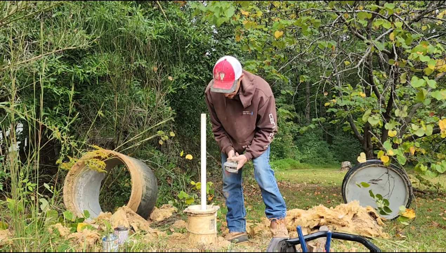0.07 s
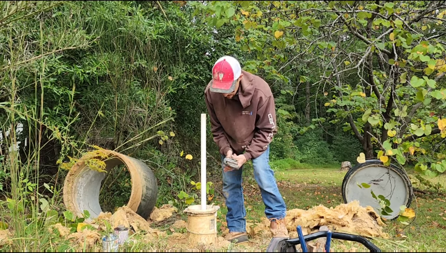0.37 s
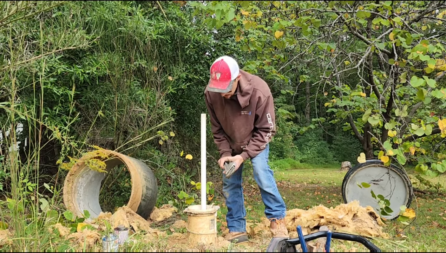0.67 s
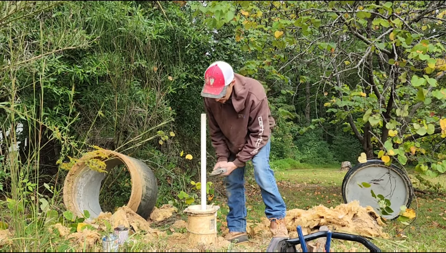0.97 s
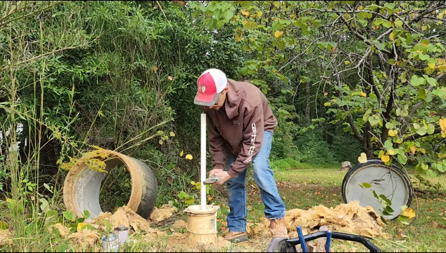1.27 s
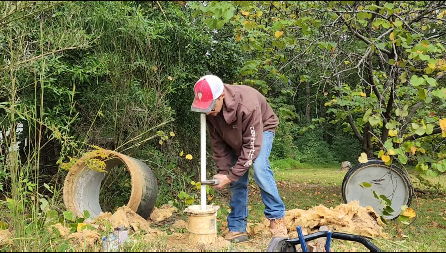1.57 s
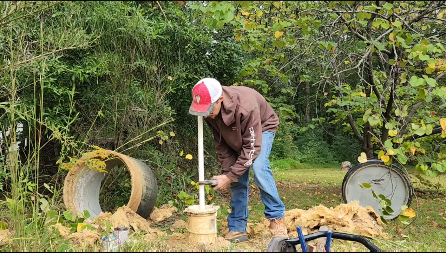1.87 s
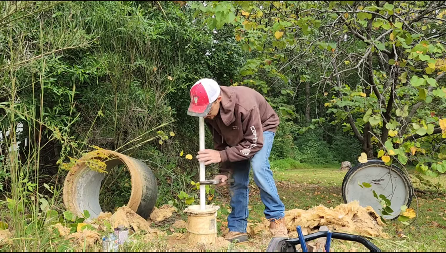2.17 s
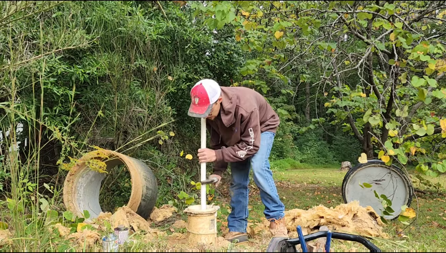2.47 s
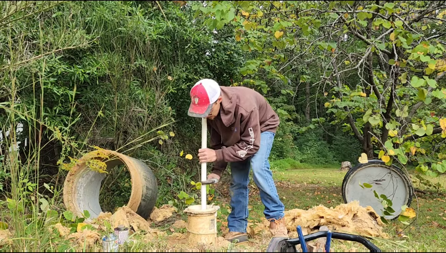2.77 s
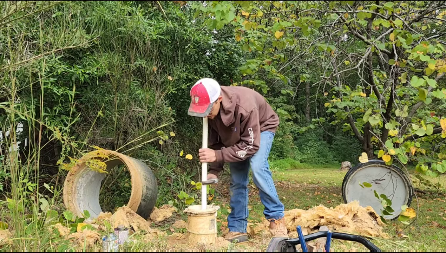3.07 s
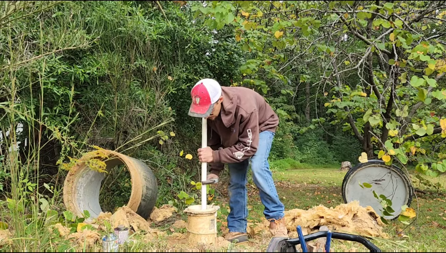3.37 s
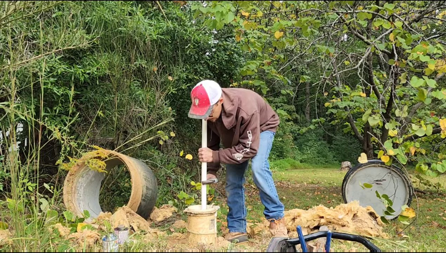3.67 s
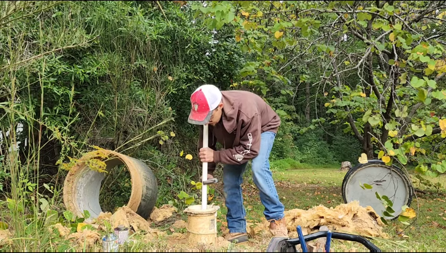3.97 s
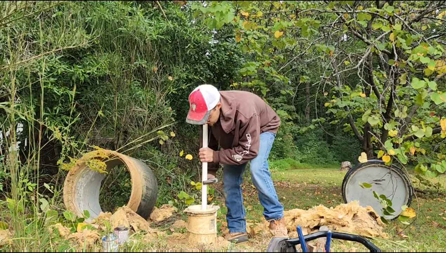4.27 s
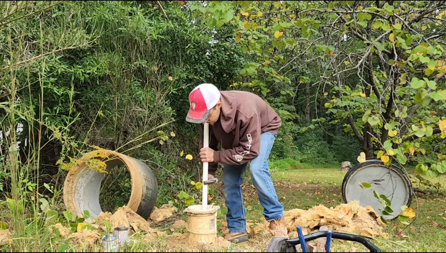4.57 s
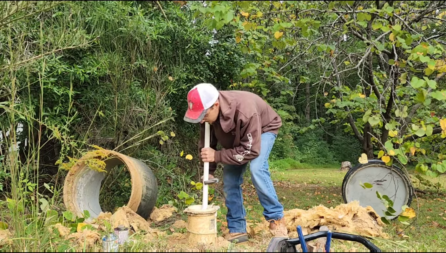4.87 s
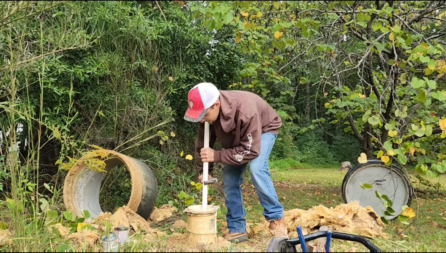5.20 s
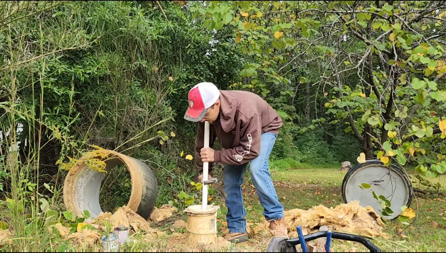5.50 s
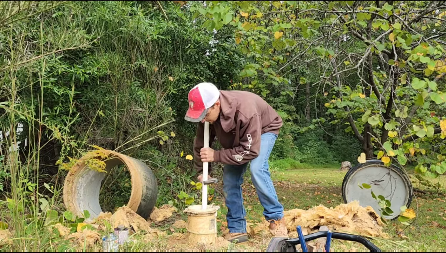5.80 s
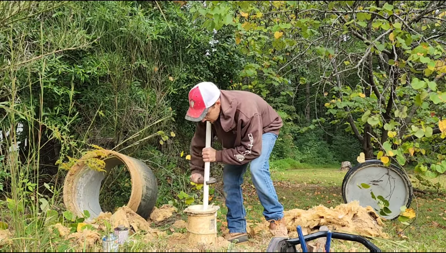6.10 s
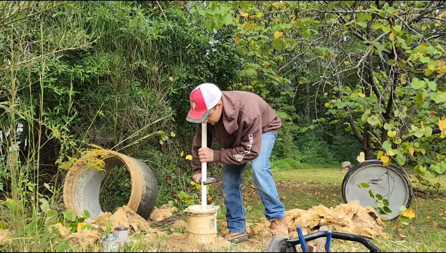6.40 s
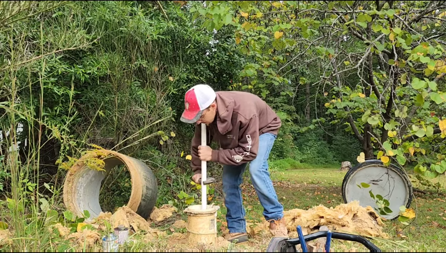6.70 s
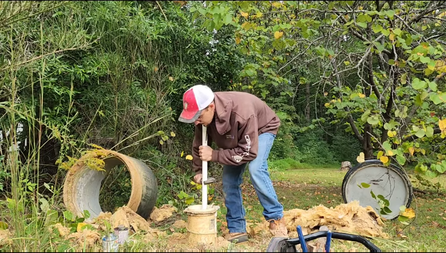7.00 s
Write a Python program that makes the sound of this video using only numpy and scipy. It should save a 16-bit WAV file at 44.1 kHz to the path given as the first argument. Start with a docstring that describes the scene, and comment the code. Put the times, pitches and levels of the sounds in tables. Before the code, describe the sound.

Scattered hollow knocks and one sharp splintering snap of a plastic pipe being cut outdoors, over low wind rumble and faint birds.

```python
"""A plastic well pipe, worked with a hand cutter a few metres ahead, gives with one splintering snap;
its bending waves disperse and return as a falling chirp. From the right come two runs of hollow
knocks, as of a hammer exciting the modes of boards. Trees at the edge of the wood scatter every blow.
A small bird chips over far calls, a cricket, a distant wash, a drone and leaf hiss; gusts and soft
bumps of the hand rumble on the phone that picks up the scene."""
import sys
import numpy as np
from scipy import signal
from scipy.fft import rfft, irfft
from scipy.io import wavfile
from scipy.ndimage import uniform_filter1d

SR = 44100
rng = np.random.default_rng(int(sys.argv[2]) if len(sys.argv) > 2 else 0)


def materialize(psi):
    """Save the field psi as 16-bit PCM at rate SR to the path in sys.argv[1].

    A 1-D psi becomes a single channel; in a 2-D psi each row is a channel.
    """
    bounded = np.clip(np.atleast_2d(psi).T, -1, 1)
    quanta = np.round(bounded * 32767).astype(np.int16)
    wavfile.write(sys.argv[1], SR, quanta)


N = 315092
T = np.arange(N) / SR
SHORT = T[:SR // 2]
RIGHT_LAG_S, AHEAD_LAG_S, BUSH_LAG_S = 21 / SR, -2 / SR, -7 / SR  # left port's delay, by direction
DRIVE_S = .0034  # from the hammer's first touch to the full blow
TOP_HZ = 15600


def amp(db):
    """Amplitude ratio of a level in decibels."""
    return 10 ** (np.asarray(db) / 20)


def unit(x):
    """Normalisation to rms 1."""
    return x / np.sqrt(np.mean(x ** 2))


def add(track, s, sound):
    """Superposition: a sound joins a track at time s."""
    i = max(int(s * SR), 0)
    part = sound[..., :track.shape[-1] - i]
    track[..., i:i + part.shape[-1]] += part


def through(x, response):
    """Convolution with an impulse response."""
    return signal.fftconvolve(x, response)[:len(x)]


def below(x, hz):
    """First-order low-pass."""
    return signal.sosfilt(signal.butter(1, hz, fs=SR, output="sos"), x)


def colour(x, points, size=4096):
    """Minimum-phase filter through (frequency [Hz], level [dB]) points; white noise keeps its power."""
    hz, db = np.transpose(points)
    f = np.maximum(np.arange(size // 2 + 1) * SR / size, 1)
    gain = amp(np.interp(np.log(f), np.log(hz), db))
    cepstrum = irfft(np.log(gain))
    cepstrum[1:size // 2] *= 2
    cepstrum[size // 2 + 1:] = 0
    response = irfft(np.exp(rfft(cepstrum)))
    return through(x, response / np.linalg.norm(response))


def whiten(x, width_hz=250):
    """Spectral whitening: a contact loses its pitch and keeps its energy."""
    spectrum = rfft(x, 2 * len(x))
    power = uniform_filter1d(np.abs(spectrum) ** 2, int(width_hz * 2 * len(x) / SR))
    flat = irfft(spectrum / np.sqrt(power))[:len(x)]
    return flat * np.linalg.norm(x) / np.linalg.norm(flat)


def decay(t60, t=SHORT):
    """Exponential damping, 60 dB in t60 seconds."""
    return np.exp(-np.log(1000) * t / t60)


def burst(t60, edge=3):
    """Impulsive excitation: one sharp spike of size edge, then a dying swarm of tiny ones."""
    swarm = rng.standard_normal(len(SHORT)) * decay(t60)
    swarm[0] = edge
    return swarm


def ring(modes):
    """Free vibration of damped modes; neighbours start in opposite phase."""
    return sum((-1) ** k * amp(db) * np.sin(2 * np.pi * hz * SHORT) * decay(t60)
               for k, (hz, db, t60) in enumerate(modes))


def glide(from_hz, to_hz, glide_s, attack_s, hold_s, t60):
    """Exponential frequency sweep that swells, holds and decays."""
    hz = to_hz + (from_hz - to_hz) * np.exp(-SHORT / glide_s)
    envelope = np.minimum(SHORT / attack_s, 1) * decay(t60, np.maximum(SHORT - attack_s - hold_s, 0))
    return envelope * np.sin(2 * np.pi * np.cumsum(hz) / SR)


def drift(rate_hz):
    """Smooth random modulation of rms 1."""
    hold = int(SR / rate_hz)
    steps = np.repeat(rng.standard_normal(N // hold + 1), hold)
    return unit(uniform_filter1d(steps, hold)[:N])


def ports(x, lag_s, shade_db=0):
    """Path difference and shadowing: the left microphone port lags, its treble shaded by the phone."""
    n = len(x)
    f = np.arange(n + 1) * SR / (2 * n)
    shade = amp(shade_db * f ** 2 / (f ** 2 + 4000 ** 2) / 2)
    spectrum = rfft(x, 2 * n)
    left = irfft(spectrum * shade * np.exp(-2j * np.pi * f * lag_s))
    right = irfft(spectrum / shade)
    return np.array([left[:n], right[:n]])


def diffuse(mid, side):
    """Diffuse field: sound comes from all around, and long waves reach both ports alike."""
    side = side - below(side, 500)
    return np.array([mid + side, mid - side]) / np.sqrt(2)


def woods(x, near_db, near_t60, far_db, far_t60):
    """Scattering by ground and bushes, then deeper trees; never twice the same, as the leaves stir."""
    # spectrum of the scatter: (frequency [Hz], level [dB])
    trees = [(60, -10), (250, -1.5), (700, 5), (1600, -1), (3200, -3), (5000, 0), (7500, -3), (14000, -3)]
    t, pair = T[:SR], []
    onset = 1 - np.exp(-t / 0.0034)
    for _ in range(2):
        echoes = onset * rng.standard_normal(SR) * amp(4.14 * rng.standard_normal(SR))
        near, far = echoes * decay(near_t60, t), echoes * decay(far_t60, t)
        response = amp(near_db) * near / np.linalg.norm(near) + amp(far_db) * far / np.linalg.norm(far)
        pair.append(through(x, colour(response, trees)))
    return diffuse(*pair)


def far_wash():
    """Band-limited noise from far to the right, slowly modulated in level."""
    # spectrum of the wash: (frequency [Hz], level [dB])
    spectrum = [(300, -11), (750, -2.5), (1400, 0), (2200, -3), (6000, -32)]
    level_db = -71 + 1.3 * drift(5)
    return ports(amp(level_db) * colour(rng.standard_normal(N), spectrum), RIGHT_LAG_S)


def drone():
    """Steady low noise, as of far traffic, whose long waves reach both ports in phase."""
    # spectrum of the drone: (frequency [Hz], level [dB])
    spectrum = [(60, -12.5), (150, 0), (210, -2), (300, -15.5), (600, -56.5)]
    return amp(-64.5) * unit(colour(rng.standard_normal(N), spectrum))


def leaves():
    """Incoherent hiss of foliage; the breeze moves near, bright leaves more than far, dull ones."""
    # course of the breeze: (time [s], relative level [dB])
    breeze = [(0.0, -67.5), (0.44, -73), (0.95, -70.5), (4.91, -66), (6.04, -66.5), (7.14, -69)]
    # spectrum of the rustle: (frequency [Hz], level [dB])
    rustle = [(180, -17.5), (300, -5), (480, -2.5), (750, -1.5), (1100, -6), (2050, -6.5), (2790, -7),
              (5200, -9.5), (6300, -12.5), (7400, -12.5), (9200, -18.5), (10800, -29), (15000, -31)]
    canopy = diffuse(*[unit(colour(rng.standard_normal(N), rustle)) for _ in range(2)])
    bush = below(colour(rng.standard_normal(N), rustle), 2900)
    hiss = canopy + amp(-6) * ports(bush, BUSH_LAG_S)
    dull = below(hiss, 2900)
    breeze_db = np.interp(T, *np.transpose(breeze)) + 0.2 * drift(16)
    far = dull * amp((breeze_db + breeze_db.mean()) / 2)
    near = (hiss - dull) * amp(breeze_db)
    return amp([[7], [6]]) * (far + near)  # slightly louder on the left


def cricket(pitch_hz=4560, chirps_per_s=6.8):
    """Amplitude modulation: a faint whistle pulses deep in the grass and soon fades."""
    # fading of the song: (time [s], level [dB])
    levels = [(1.5, -70.5), (2.2, -79)]
    chirps = np.sin(np.pi * np.cumsum(chirps_per_s + .5 * drift(2)) / SR) ** 2
    tone = np.sin(2 * np.pi * np.cumsum(pitch_hz + 25 * drift(120)) / SR)
    return ports(amp(np.interp(T, *np.transpose(levels))) * chirps * tone, AHEAD_LAG_S)


def far_birds(half_length_s=0.022, waver=0.032):
    """Frequency modulation: short, wavering notes, scattered from deep in the wood."""
    # far calls: (time [s], pitch [Hz], level [dB])
    calls = [(1.331, 3450, -66), (2.42, 2300, -69), (2.84, 2570, -71), (3.37, 2000, -68), (3.86, 7100, -66),
             (4.17, 2020, -70)]
    dry = np.zeros(N)
    for s, hz, db in calls:
        phase = 2 * np.pi * np.cumsum(hz * (1 + waver * drift(300))) / SR
        dry += amp(db) * np.exp(-((T - s) / half_length_s) ** 2) * np.sin(phase)
    return ports(dry, AHEAD_LAG_S) + woods(dry, near_db=-4, near_t60=.26, far_db=-7, far_t60=.63)


def bird():
    """A thin upward sweep that levels off, prolonged by reverberation among the trees."""
    # chips: (time [s], level [dB])
    chips = [(0.057, -50), (6.565, -50.5)]
    dry = np.zeros(N)
    chip = glide(from_hz=5600, to_hz=7750, glide_s=0.007, attack_s=0.0044, hold_s=0.017, t60=0.04)
    for s, db in chips:
        add(dry, s, amp(db) * chip)
    return ports(dry, RIGHT_LAG_S) + woods(dry, near_db=-4, near_t60=0.21, far_db=-3.5, far_t60=0.71)


def wind(calm_db=-49, attack_s=0.027, release_s=0.05):
    """Turbulence buffets both ports nearly alike; gusts rise from a calm and eddies shake the level."""
    # gusts: (start [s], length [s], level [dB])
    gusts = [(0.623, 0.39, -41.5), (1.835, 0.23, -45), (2.458, 0.57, -44.5), (3.221, 0.59, -40.5),
             (4.214, 0.91, -43), (5.126, 0.33, -40.5), (6.184, 0.093, -40.5), (6.733, 0.56, -43.5)]
    # spectrum of the buffeting: (frequency [Hz], level [dB])
    rumble = [(12, -35.5), (20, -13.5), (49, 2.5), (78, 0.5), (117, -6.5), (316, -41.5), (600, -56.5),
              (1100, -120)]
    mid, side = (unit(colour(rng.standard_normal(N), rumble)) for _ in range(2))
    air = mid + amp(-11) * np.array([side, -side])
    rise_db = np.zeros(N)
    for s, length, db in gusts:
        swell = np.interp(T, [s - attack_s, s, s + length, s + length + release_s], [0, 1, 1, 0])
        rise_db = np.maximum(rise_db, (db - calm_db) * swell)
    eddies_db = 2.5 * drift(22)
    return air * amp(calm_db + rise_db + eddies_db)


def hand_bumps():
    """Structure-borne sound: the hand shifts on the phone with a soft push and a dull jostle."""
    # bumps: (time [s], push level [dB], frequency [Hz], jostle level [dB])
    bumps = [(0.64, -34.5, 56, -69), (2.666, -27.5, 63, -47), (2.698, -28.5, 83, -43.5),
             (3.001, -33, 69, -58), (3.267, -23.5, 96.5, -34), (3.495, -28.5, 78.5, -43.5),
             (4.347, -33, 68, -63), (6.263, -33, 87, -43), (6.593, -36, 64.6, -38)]
    # response of the case: (frequency [Hz], level [dB])
    case = [(50, -7.5), (130, 2.5), (190, -8.5), (280, -26), (1200, -97)]
    pushes, force = np.zeros((2, N))
    for s, db, hz, jostle_db in bumps:
        envelope = np.exp(-((T - s) * hz / 0.73) ** 2)
        pushes += amp(db) * envelope * np.sin(2 * np.pi * hz * (T - s))
        add(force, s, amp(jostle_db) * burst(t60=0.2))
    return pushes + colour(force, case)


def ticks():
    """Brief impulses have broad spectra: light, bright ticks, the last belonging to the pipe's snap."""
    # ticks: (time [s], relative level [dB])
    onsets = [(0.711, -48.5), (5.839, -48.5), (6.1417, -40.5)]
    # spectrum of a tick: (frequency [Hz], level [dB])
    spectrum = [(1500, -31), (3600, 5.5), (5000, -9), (6500, 0), (9500, -1.5), (15000, -10)]
    force = np.zeros(N)
    for s, db in onsets:
        add(force, s, amp(db + 2) * burst(t60=0.012))
    dry = colour(force, spectrum)
    return ports(dry, AHEAD_LAG_S) + woods(dry, near_db=-2, near_t60=0.038, far_db=-42, far_t60=.7)


def blow(touch_db, drive_db, t60):
    """Two-stage contact force: the hammer head touches, then drives home."""
    force = np.zeros(SR)
    add(force, 0, amp(touch_db) * whiten(burst(t60)))
    add(force, DRIVE_S, amp(drive_db) * whiten(burst(t60)))
    return force


def knocks(hollow_hz=1407, hollow_t60=0.049, rebound_s=.028, rebound_db=-11.5):
    """Impacts excite the boards' modes according to where they land; scattering blurs the pitch."""
    # blows, at relative levels: (time [s], rap [dB], pitch [ratio], hollow ring [dB], thump [dB],
    # crack [dB], sizzle [dB], sheen [dB], spot [0 mid-span to 1 near a support], scatter [dB])
    blows = [(0.057, -32.5, 0.96, -25, -35, -43, -36, -53.5, 0.14, -7.5),
             (0.3958, -40, 1.04, -44, -38, -52.5, -44, -66, 0.067, -5),
             (0.785, -32.5, 1.03, -30, -35, -50.5, -49, -70, 0.089, -4),
             (0.836, -43.5, 1.02, -47, -45.5, -54, -60, -75, 0.94, -3.5),
             (1.5177, -32.5, 0.9, -29, -36, -54, -59, -70, 0.038, -5),
             (1.932, -39.5, 0.84, -43, -34.5, -54.5, -54.5, -62, 0.078, -3),
             (4.838, -31.5, 1.09, -49, -34, -41.5, -40.5, -49, 0.64, -7.5),
             (5.2423, -28.5, 1.1, -29, -33.5, -46.5, -46.5, -51, 0.41, -8),
             (5.587, -33, 1.06, -30.5, -35.5, -56, -52, -62, 0.3, -6.5),
             (5.931, -36, 0.98, -37, -38.5, -55, -58, -70, 1, -4.5)]
    # board modes: (frequency [Hz], t60 [s], level struck mid-span [dB], level struck near a support [dB])
    modes = [(77.4, 0.088, 9, -16.5), (113.2, 0.14, 4.5, -10.5), (163, 0.2, -6, -4),
             (219, 0.12, -2.5, -0.5), (290.6, 0.049, -2, -1.5)]
    # roll-off of the scattered thump above the modes: (frequency [Hz], level [dB])
    boom_top = [(480, -16.5), (1500, -60.5)]
    # spectra of the contact, from woody rap to top treble: (frequency [Hz], level [dB])
    rap = [(200, -15), (550, -7), (900, -2), (1100, -5), (1400, 2), (2100, 0.5), (2800, -8), (5000, -51)]
    crack = [(1500, -30), (3000, 0.5), (3900, -1), (5000, -5.5), (8000, -22), (12000, -34)]
    sizzle = [(3500, -39), (6500, 0.5), (8600, -4.5), (9800, -17), (15000, -42)]
    sheen = [(6000, -21), (10000, -1), (12500, -1), (15000, -7.5)]
    out = np.zeros((2, N))
    for s, rap_db, pitch, hollow_db, thump_db, crack_db, sizzle_db, sheen_db, spot, scatter_db in blows:
        bands = [(blow(rap_db - 8, rap_db, t60=0.028), [(hz * pitch, db) for hz, db in rap]),
                 (blow(crack_db + 8, crack_db + 4, t60=0.025), crack),
                 (blow(sizzle_db + 1, sizzle_db + 5, t60=0.011), sizzle),
                 (blow(sheen_db + 0.5, sheen_db - 1, t60=0.042), sheen)]
        contact = sum(colour(force, shape) for force, shape in bands)
        add(contact, DRIVE_S, ring([(hollow_hz * pitch, hollow_db - 6.5, hollow_t60)]))
        struck = [(hz, mid + spot * (end - mid), t60) for hz, t60, mid, end in modes]
        detune = 1 + 0.051 * rng.standard_normal(len(modes))  # no two blows are quite alike
        boards = ring([(hz * d, thump_db + 4 + db, t60) for (hz, db, t60), d in zip(struck, detune)])
        thump = np.zeros(SR)
        add(thump, 0, boards)
        add(thump, rebound_s, amp(rebound_db) * boards)  # the boards fall back
        direct = ports(contact + thump, RIGHT_LAG_S, shade_db=-5)
        # the trees receive one pitchless pulse for the thump and one for each band
        boom = [(hz, db) for hz, db, _ in struck] + boom_top
        pulses = colour(amp(-2.5) * np.linalg.norm(thump) * signal.unit_impulse(SR), boom)
        for k, (force, shape) in enumerate(bands):
            impulse = signal.unit_impulse(SR, int(k * DRIVE_S * SR / 4))
            pulses += colour(np.linalg.norm(force) * impulse, shape)
        scatter = woods(pulses, near_db=scatter_db, near_t60=0.3, far_db=scatter_db - 10, far_t60=1.0)
        add(out, s, direct + scatter)
    return out


def splinters(count=40, start_s=6.105, middle_hz=3300, spread_octaves=0.62, ring_t60=0.005):
    """Crack propagation: tiny fractures, each with its own pitch and place, thin out along the split."""
    out = np.zeros((2, N))
    for age, (offset, size, place) in zip(rng.exponential(.025, count), rng.standard_normal((count, 3))):
        hz = min(middle_hz * 2 ** (spread_octaves * offset), TOP_HZ)
        grain = ring([(hz, -27.5 + 4 * np.tanh(size), ring_t60)])[:SR // 20]
        add(out, start_s + age, ports(grain * decay(0.2, age), AHEAD_LAG_S * (1 + place)))
    return out


def pipe(grit_share=0.48):
    """Impulses set the pipe thudding and ringing; the snap's bending waves disperse, high notes first."""
    # two soft knocks, then the pipe's splintering snap and a last small click:
    # (time [s], relative crack level [dB], t60 [s], thud level [dB])
    impulses = [(4.972, -53.5, 0.05, -48.5), (6.022, -54.5, 0.04, -49), (6.097, -30, 0.079, -42),
                (6.101, -15.5, 0.021, -30.5), (6.1024, -29, 0.033, -61), (6.1054, -35, 0.026, -30.5),
                (6.124, -36, 0.018, -60), (6.144, -34.5, 0.023, -41), (6.17, -44, 0.09, -66),
                (6.3713, -34.5, 0.0098, -36.5)]
    # spectrum of the plastic's crack: (frequency [Hz], level [dB])
    plastic = [(100, -10), (260, -2), (600, -13.5), (950, -0.5), (1250, -4), (1750, 7), (2400, -0.5),
               (3200, 2.5), (4200, -1), (7500, -7), (11500, -10.5), (15000, -26)]
    # modes of the wall, and of the whole pipe in its casing: (frequency [Hz], level [dB], t60 [s])
    wall_modes = [(926, -5.5, 0.21), (1253, 0, 0.16), (1616, 6, 0.083), (1810, 14, 0.07), (2124, 8, 0.19),
                  (2960, 3, 0.04), (3280, -2, 0.05), (4300, 14, 0.04)]
    thud_modes = [(105, -1.5, 0.17), (258, 0.5, 0.046), (477, -2.5, 0.02)]
    # bending waves from the snap, then back from the far end:
    # (time [s], relative level [dB], first pitch [Hz], glide [s], hold [s], t60 [s])
    bends = [(6.1027, -28, 2948, 0.0052, 0.001, 0.05), (6.182, -43.5, 2400, 0.015, 0.013, 0.19)]
    force, flex, thud = np.zeros((3, N))
    for s, crack_db, t60, thud_db in impulses:
        crack = amp(crack_db - 1.5) * whiten(burst(t60, edge=4.4))
        add(force, s, crack)
        add(flex, s, amp(crack_db / 2) * crack)  # hard impulses ring the wall far more than soft ones
        add(thud, s, amp(thud_db) * ring(thud_modes))
    wall = ring(wall_modes)
    dry = thud + colour(force, plastic) + amp(-1) * through(flex, wall / np.linalg.norm(wall))
    for s, db, from_hz, glide_s, hold_s, t60 in bends:
        chirp = glide(from_hz, to_hz=1420, glide_s=glide_s, attack_s=0.0017, hold_s=hold_s, t60=t60)
        grit = 1 - grit_share + grit_share * drift(900)[:len(chirp)]
        add(dry, s, amp(db) * chirp * grit)
    direct = ports(dry, AHEAD_LAG_S) * amp([[.8], [-.8]])
    return direct + woods(dry, near_db=-9.5, near_t60=0.11, far_db=-19, far_t60=0.65)


def scene():
    """Superposition of all sources at the two ports."""
    work = knocks() + pipe() + splinters() + ticks()
    surroundings = far_wash() + bird() + far_birds() + cricket()
    return work + surroundings + wind() + drone() + hand_bumps() + leaves()


def record(dry, ceiling=.35):
    """Soft saturation and band limiting: the phone rounds the loudest peaks and cuts the top treble."""
    rounded = ceiling * np.tanh(dry / ceiling)
    return signal.sosfilt(signal.ellip(8, .2, 70, TOP_HZ, fs=SR, output="sos"), rounded)


dry = scene()
out = record(dry)
materialize(out)
```